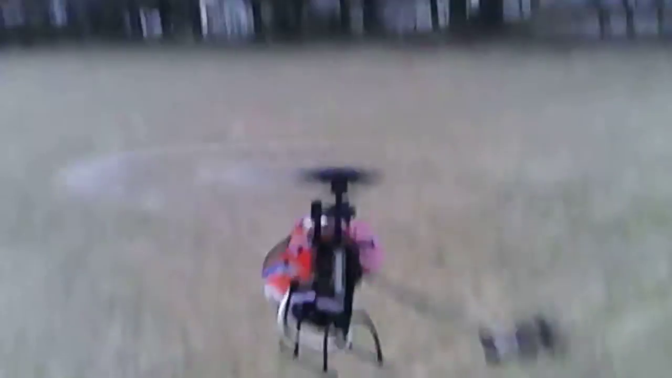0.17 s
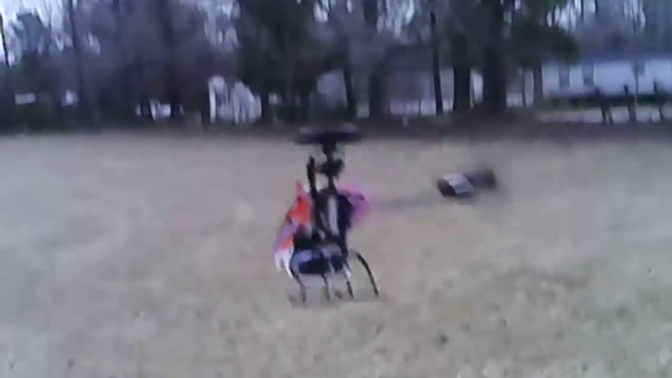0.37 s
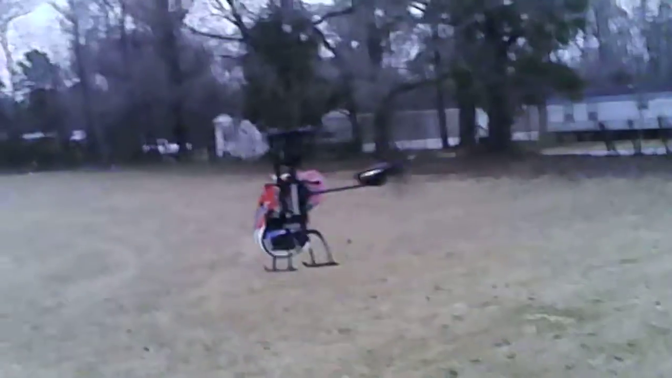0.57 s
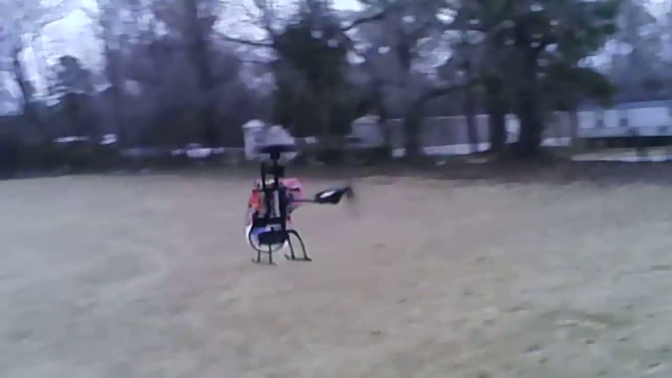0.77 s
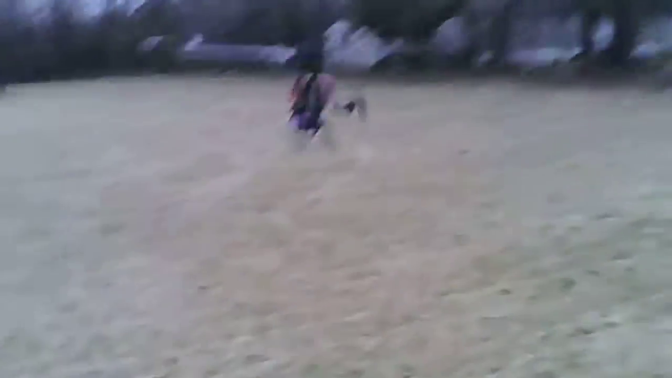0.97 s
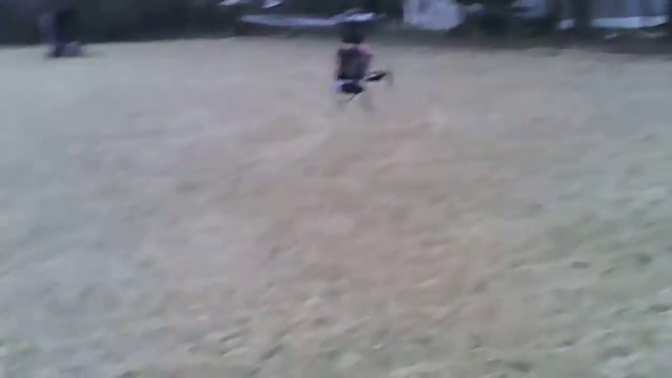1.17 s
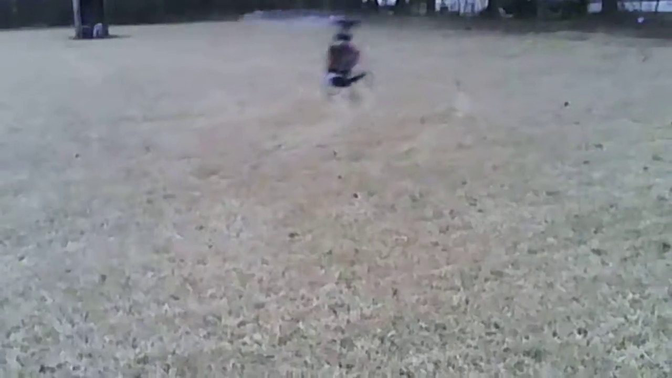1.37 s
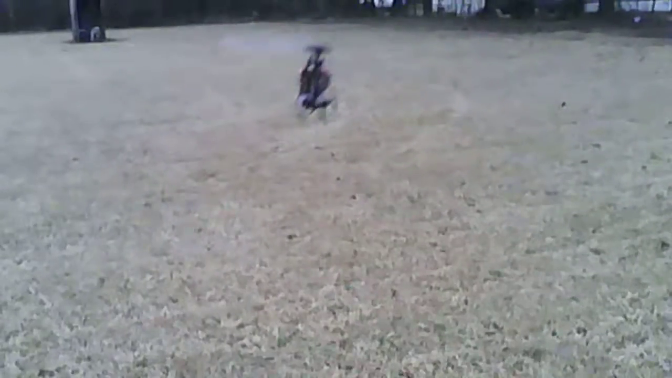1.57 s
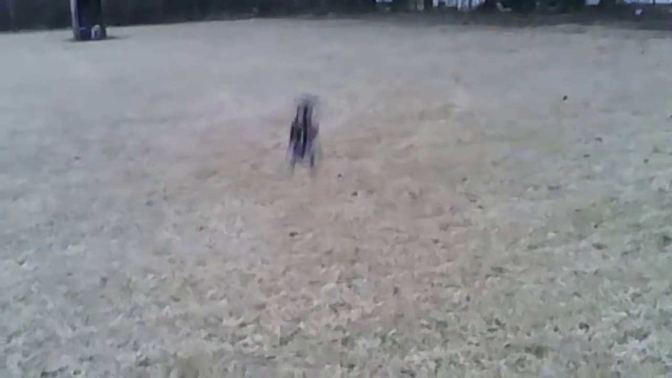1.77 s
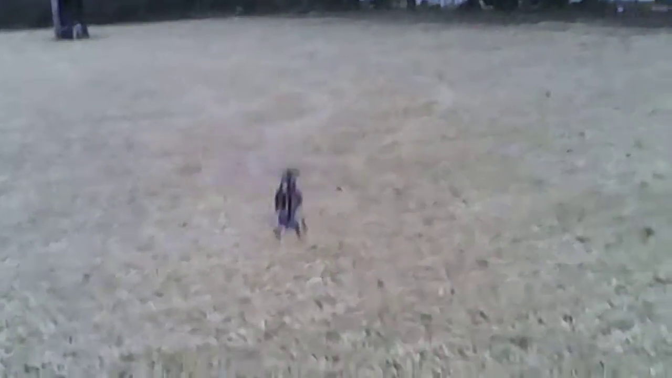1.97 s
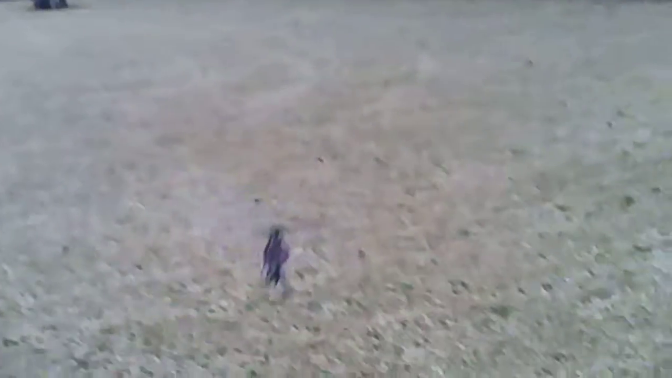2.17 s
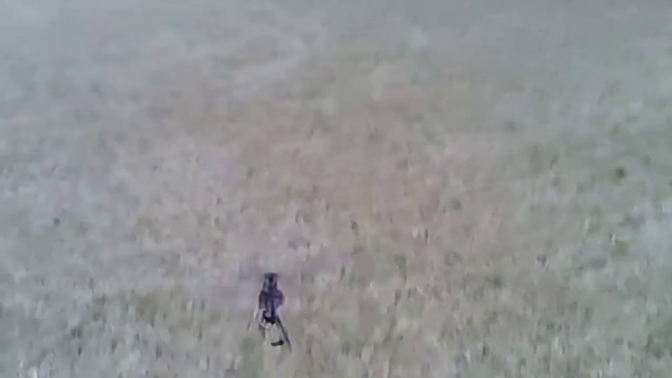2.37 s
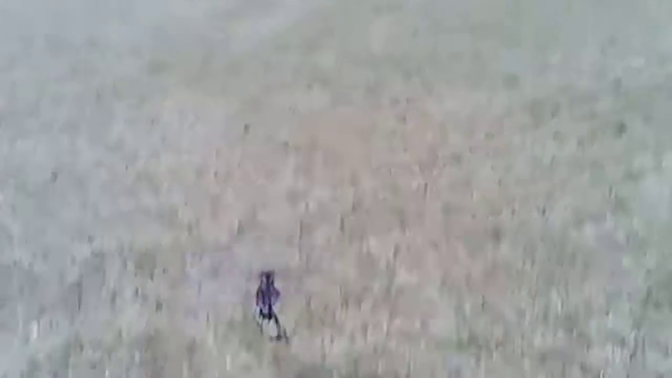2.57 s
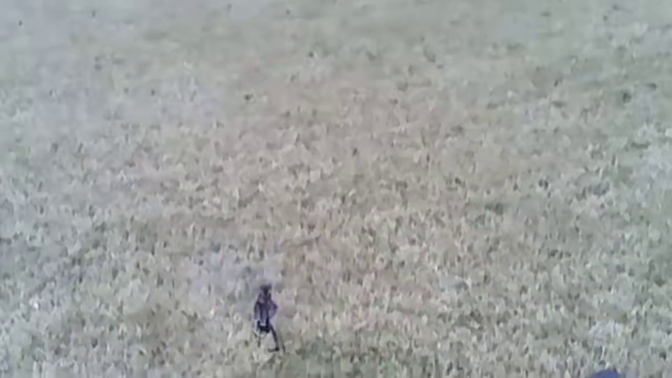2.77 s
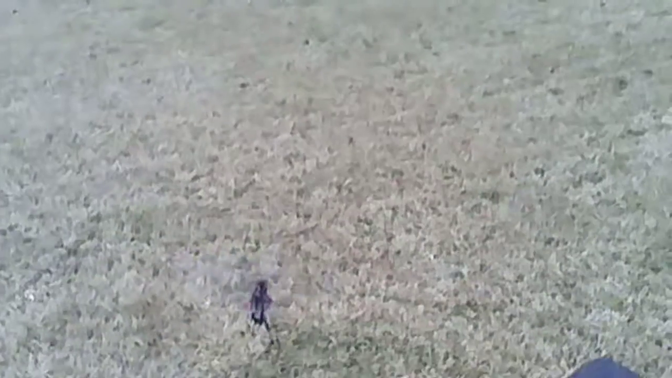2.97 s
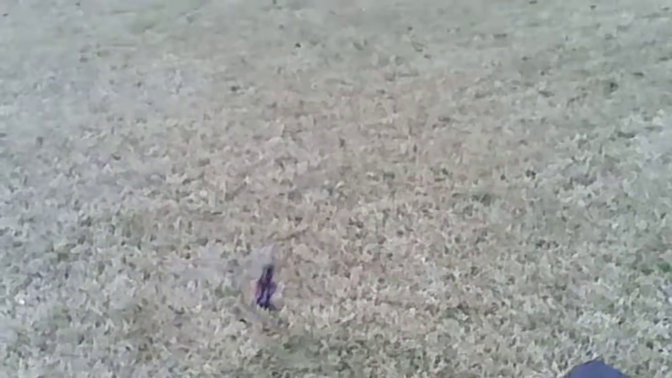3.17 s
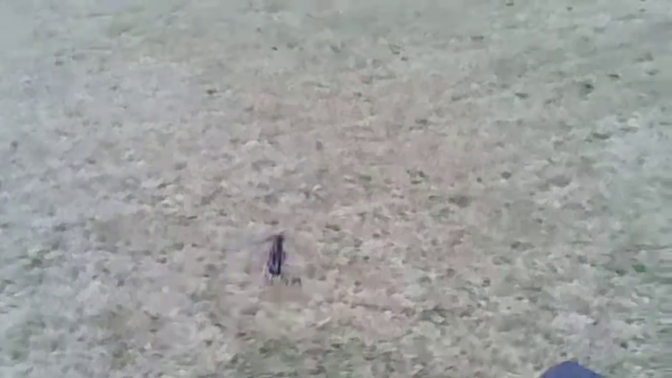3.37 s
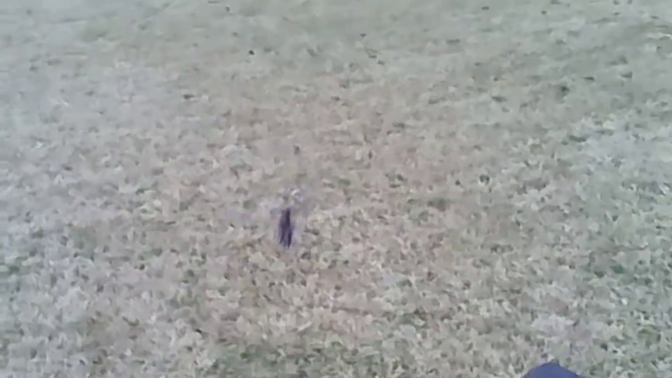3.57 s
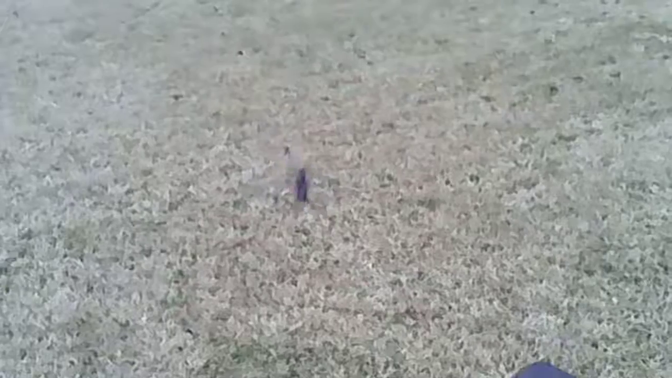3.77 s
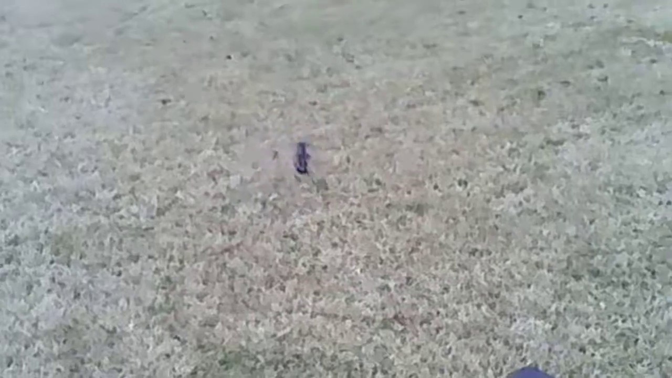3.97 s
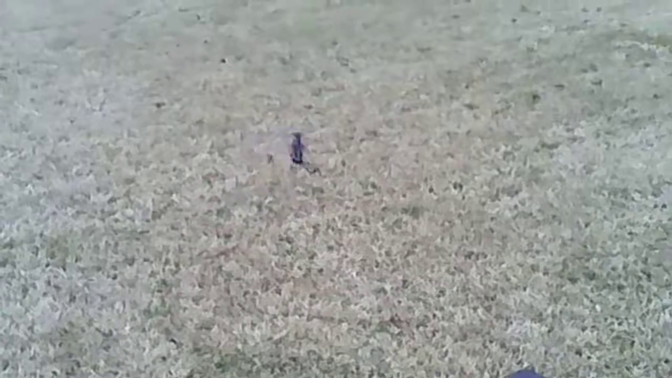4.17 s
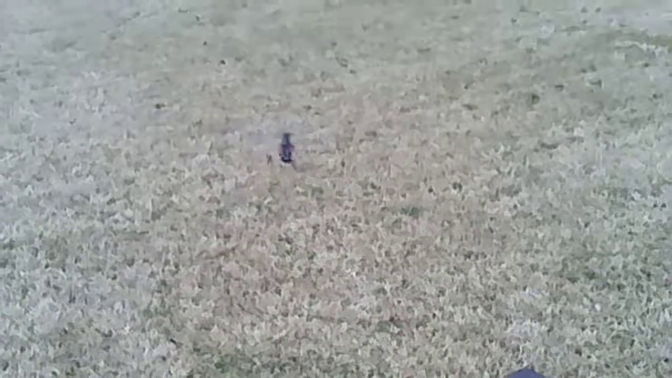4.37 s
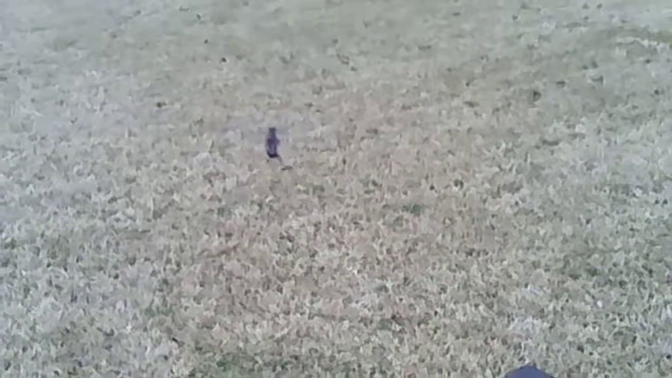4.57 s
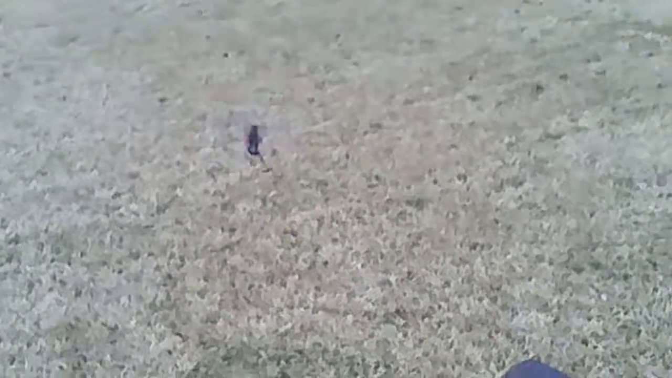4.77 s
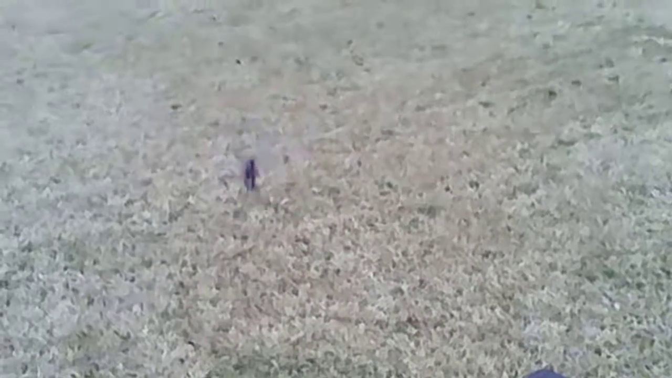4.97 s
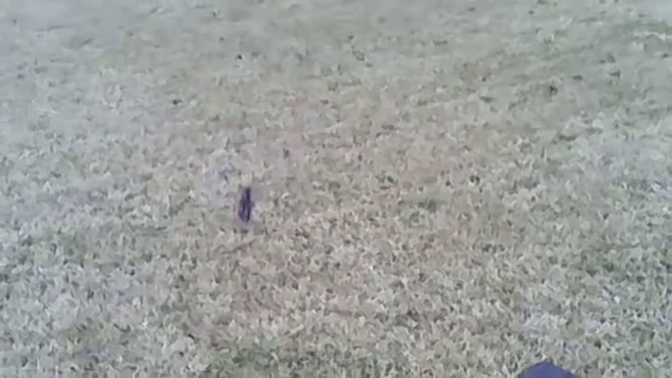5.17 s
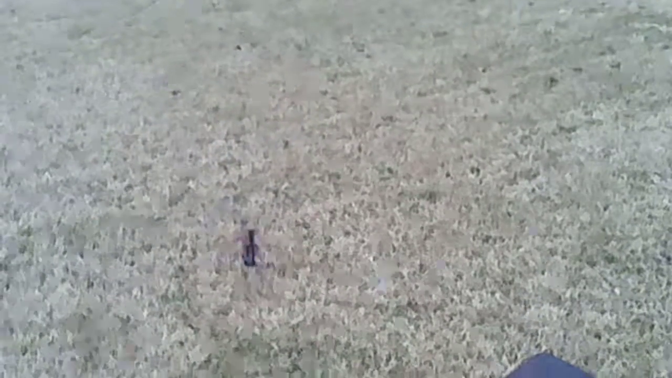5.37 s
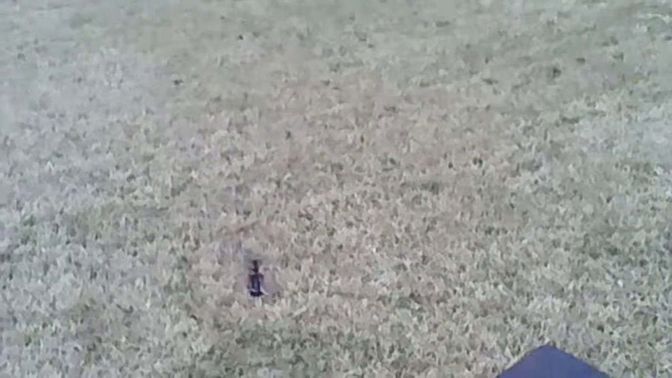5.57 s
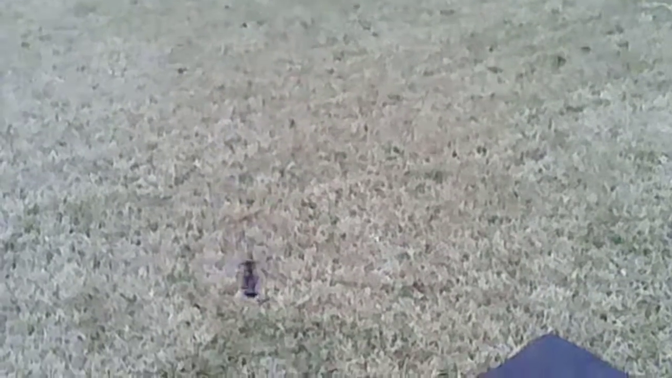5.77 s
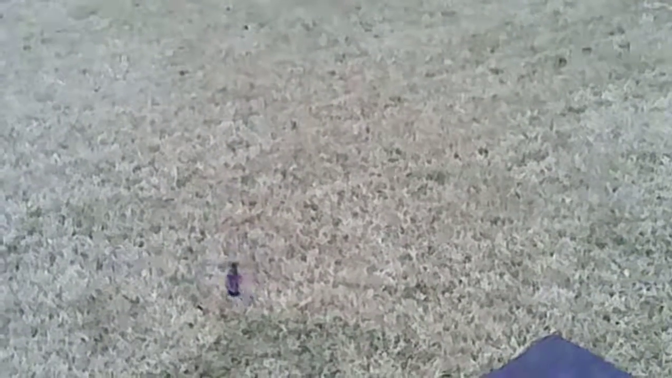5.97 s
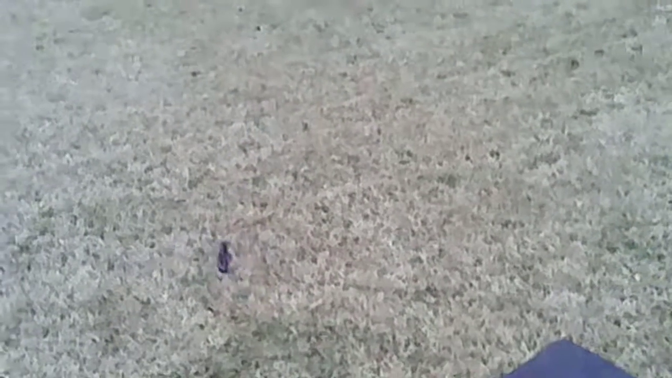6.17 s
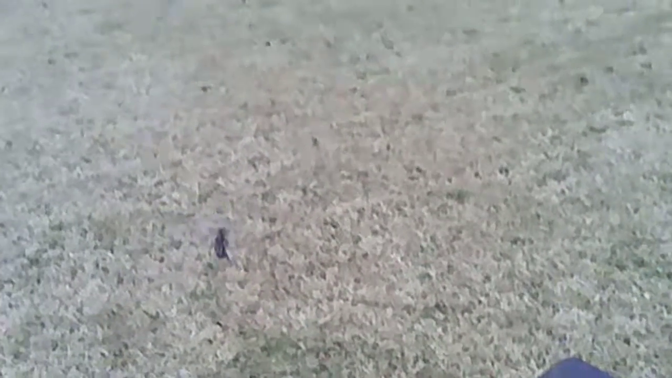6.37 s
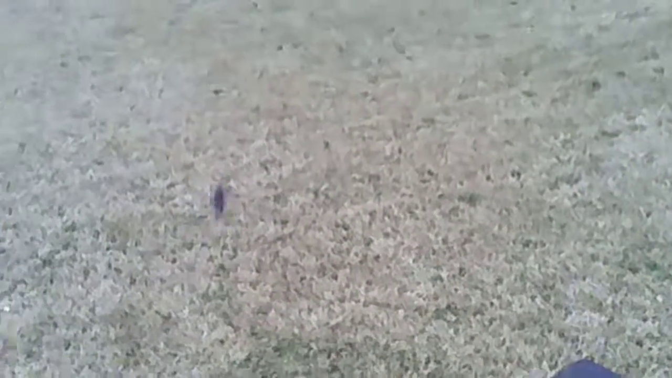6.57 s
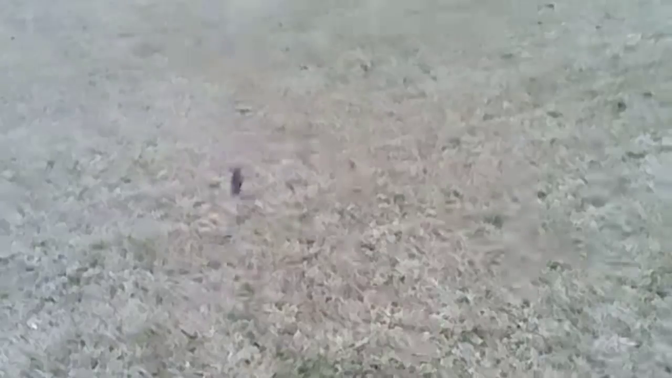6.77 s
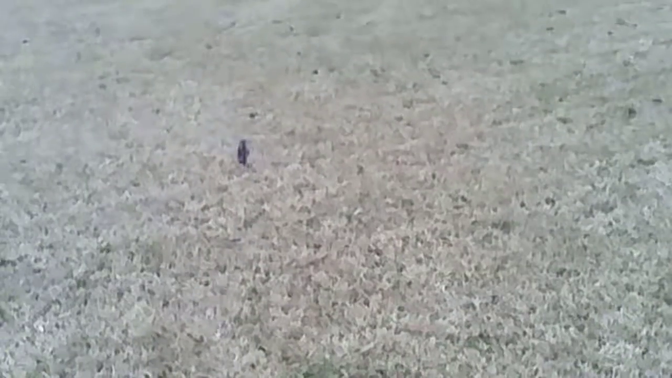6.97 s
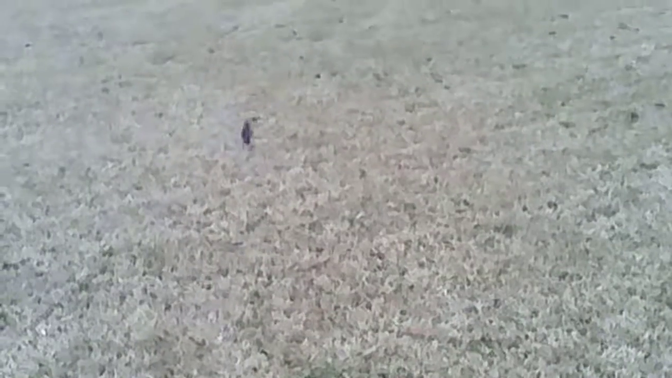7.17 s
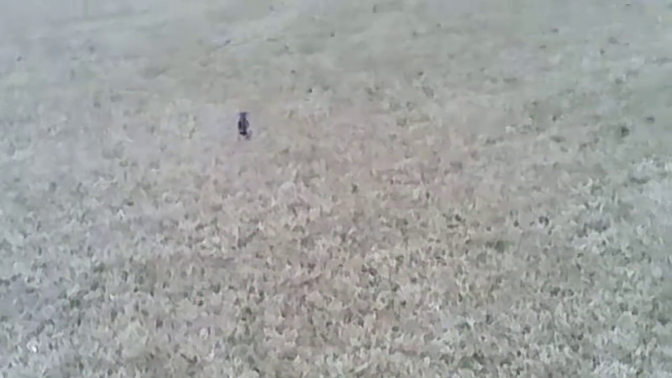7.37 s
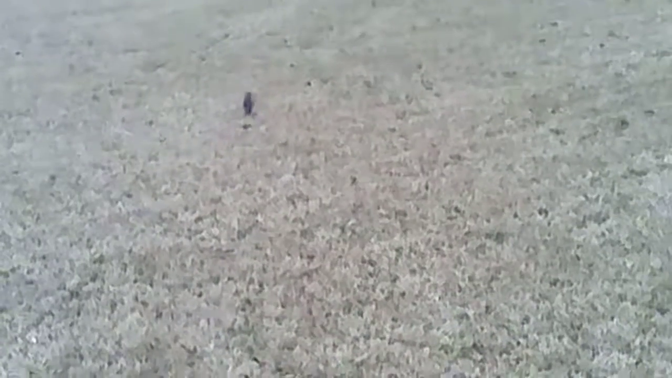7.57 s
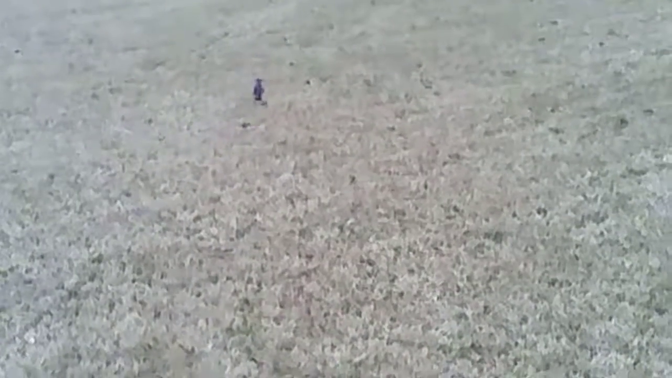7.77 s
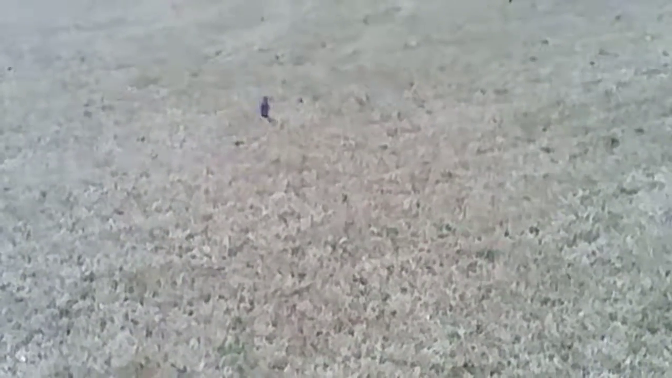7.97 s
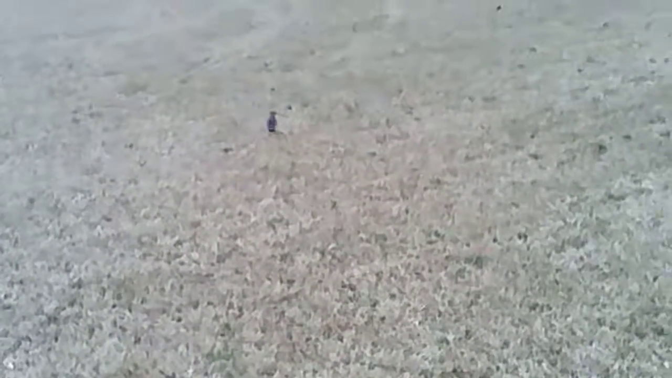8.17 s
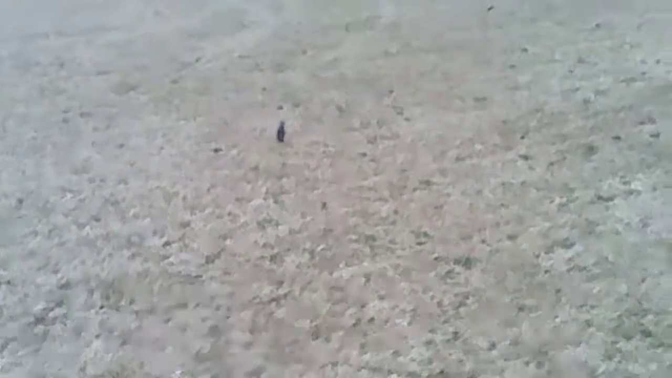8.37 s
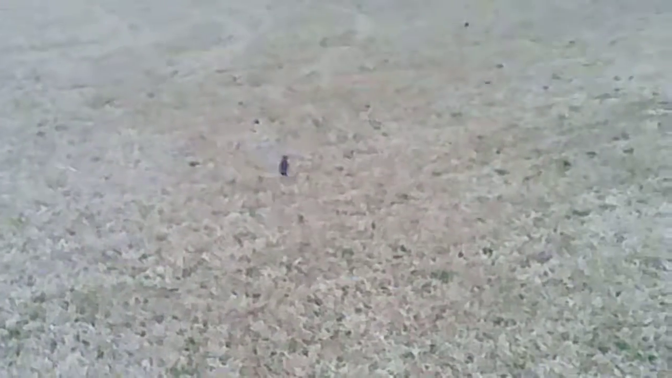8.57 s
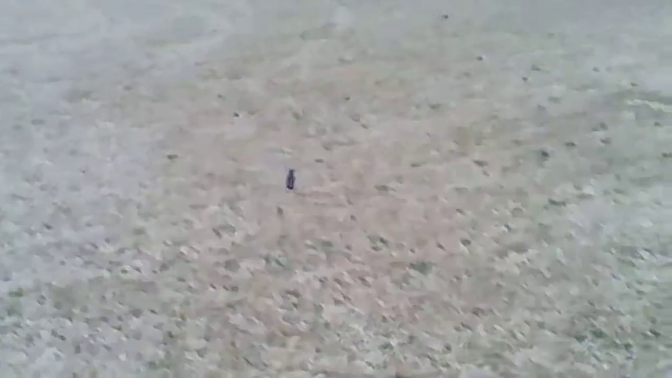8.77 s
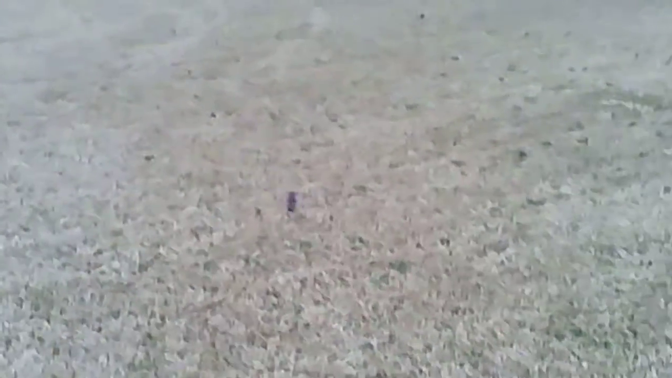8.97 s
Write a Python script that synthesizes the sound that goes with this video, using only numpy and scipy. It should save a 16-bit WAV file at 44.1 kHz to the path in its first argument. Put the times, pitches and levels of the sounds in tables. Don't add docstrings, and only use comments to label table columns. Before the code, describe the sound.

A small electric model helicopter hovers about a metre away outdoors, with a shrill, nearly steady gear whine around 3.7 kHz, many buzzing metallic overtones, a lower motor tone and bright sizzling hiss. A light hollow buckle knock comes at 0.2 s, while a faint fuzzy tail-rotor hum shifts in pitch during the first 1.5 s. The craft moves off and gradually quietens. From about 2 to 3.1 s a jacket rustles brightly near the worn microphone, with quick buckle clicks around 2.4 s. The whine dips slightly near 3.7 s; small taps and short scuffs follow around 4 s. A sharper buckle rattle clusters at 5.2-5.4 s. Another pitch sag comes near 6.5 s as the whine thins with distance. Soft cloth rubbing returns from about 8 s to the end at 9 s. Faint far traffic hums throughout, without obvious echo.

```python
import sys
import numpy as np
from scipy import signal
from scipy.fft import rfft, irfft, next_fast_len
from scipy.io import wavfile
from scipy.ndimage import uniform_filter1d, map_coordinates

SR = 44100
rng = np.random.default_rng(int(sys.argv[2]) if len(sys.argv) > 2 else 0)


def level_to_linear(level):
    exponent = np.asarray(level, float) / 20
    return 10 ** exponent


def unload_audio(sound):
    columns = np.transpose(np.atleast_2d(sound))
    steps = np.round(np.clip(columns, -1, 1) * 32767)
    wavfile.write(sys.argv[1], SR, steps.astype(np.int16))


N = 397341
GEAR_TEETH = 64

# f/Hz, level per Hz/dB
HISS_SPECTRUM = [(3000, -32), (3800, -8), (4600, -13), (5150, -40), (5550, -14.5), (6300, -29), (6850, -9),
                 (7700, -0.5), (8400, -7.5), (9100, 0.5), (9600, -1), (10500, 1), (11000, -1.5),
                 (11100, -22)]
# t/s, tooth mesh f/Hz
MESH_SPEED = [(0, 3628), (.25, 3650), (.45, 3651), (.87, 3679), (1.15, 3676), (2.0, 3732), (2.6, 3667),
              (2.95, 3648), (3.9, 3648), (4.33, 3691), (4.75, 3655), (5.1, 3669), (5.7, 3630), (6.25, 3647),
              (7.0, 3662), (7.25, 3659), (8.07, 3686), (9.01, 3677)]
# t/s, distance/m
FLIGHT_PATH = [(0, 1), (.1, 0.94), (.43, 1.17), (.8, 1.64), (1.43, 1.89), (2.66, 2.96), (3.5, 3.56),
               (4.5, 4.32), (5.6, 3.8), (6.4, 4.36), (7.5, 5.76), (7.85, 6.2), (9.01, 6.9)]
# t/s, level/dB
FLANK_TURN = [(0, -2.5), (1.4, -3.5), (2.66, -1.5), (2.95, 1.5), (3.6, 1), (3.75, -2.5), (4.7, -3.5),
              (5.2, 1), (6.42, 1.5), (6.52, -2), (7.5, -4), (7.85, -1.5), (9.01, 0.5)]


def evened(x):
    return x / np.sqrt(np.mean(x ** 2) + 1e-20)


def spectrum_at(points, hz):
    f, value = np.transpose(points)
    return np.interp(np.log(hz + 1), np.log(f + 1), value)


def follow(curve, t):
    s, value = np.transpose(curve)
    return np.interp(t, s, value)


def bump(t, centre, half):
    return np.exp(-((t - centre) / half) ** 2)


def noise(spectrum, patchy_db, size=1024, moving_db=None):
    frames = 4 * N // size + 5
    hz = np.fft.rfftfreq(size, 1 / SR)
    a, b, patches = rng.standard_normal((frames, len(hz), 3)).T
    patches = uniform_filter1d(patches, size=10, axis=0)
    patches = evened(uniform_filter1d(patches, size=14, axis=1))
    z = (a + 1j * b) * level_to_linear(spectrum_at(spectrum, hz)[:, None] + patchy_db * patches)
    x = signal.istft(z, nperseg=size, noverlap=3 * size // 4)[1][:N]
    if moving_db is None:
        return evened(x)
    frame_t = np.arange(frames) * size / 4 / SR
    z *= level_to_linear(moving_db(frame_t, hz).T) / x.std()
    return signal.istft(z, nperseg=size, noverlap=3 * size // 4)[1][:N]


def by_turn(table, rows, turns):
    return map_coordinates(table, [rows, turns % 1 * table.shape[1]], order=1, mode="grid-wrap")


def gear_db(t):
    return -24 - 20 * np.log10(follow(FLIGHT_PATH, t))


def heading_db(t, hz):
    # f/Hz, half width/Hz, share of the flank swing, extra level at 1 m/dB, extra level far away/dB
    ring_bands = [
        (7900, 590, 0.88, 7, 1.4),
        (5470, 760, 0.88, 7, 3.5),
    ]
    yaw_db = follow(FLANK_TURN, t)
    close = bump(follow(FLIGHT_PATH, t), 0.91, 0.96)
    level_db = gear_db(t)[:, None]
    for centre_hz, width, share, close_db, far_db in ring_bands:
        band = np.exp(-((hz - centre_hz) / width) ** 4)
        level_db = level_db + band * (share * yaw_db + close_db * close + far_db)[:, None]
    return level_db


def load_db(turns, blade_db=0.07, motor_db=0.5, blade_place=0.069, motor_place=0.1):
    blade = blade_db * np.cos(4 * np.pi * (turns - blade_place))
    motor = motor_db * np.cos(16 * np.pi * (turns - motor_place))
    return blade + motor


def sag_hz(t):
    # t/s, half length/s, mesh shift f/Hz
    pulls = [
        (3.68, .12, -23),
        (5.42, .1, -7),
        (6.52, .12, -20),
        (8.36, .09, -7),
        (8.78, .13, -11),
    ]
    return sum(hz * bump(t, s, half) for s, half, hz in pulls)


def mesh_rate():
    t = np.arange(N) / SR
    steady = uniform_filter1d(follow(MESH_SPEED, t), size=round(0.12 * SR), mode="nearest")
    return steady + sag_hz(t)


def far_yard():
    # f/Hz, level per Hz/dB
    yard_spectrum = [(15, -0.5), (60, -2), (90, -1.5), (102, 5.5), (116, -5.5), (140, -8), (260, -14),
                     (500, -11), (900, -0.5), (1400, -5.5), (2200, -10), (2750, -5), (3200, -17),
                     (11000, -25)]
    return level_to_linear(-41.5) * noise(yard_spectrum, patchy_db=0.26, size=4096)


def buckle(thump_hz=260, tick_hz=2900):
    # t/s, peak level/dB, ring f/Hz, T60/s, thump level/dB
    knocks = [(0.169, -31, 1247, 0.061, -1), (2.373, -31, 1212, 0.053, -24), (2.392, -31, 1230, .04, -17),
              (2.411, -32, 1200, .05, -18), (2.44, -35, 1250, .05, -18), (2.468, -29, 1216, .05, -7),
              (2.489, -31, 1270, .05, -18), (2.518, -27, 1330, .03, -19), (3.915, -29, 1452, .05, -3),
              (3.929, -32, 1460, .04, -3), (4.054, -37, 1410, 0.059, -14), (4.735, -37, 677, 0.13, -20),
              (5.04, -32, 4200, 0.031, -22), (5.248, -21.5, 1360, 0.032, -13),
              (5.275, -28, 1280, 0.043, -19), (5.323, -23, 1270, 0.085, -6), (5.344, -24, 1254, 0.056, -27),
              (5.363, -31, 1230, 0.082, -18), (5.386, -28.5, 1202, 0.048, -14),
              (5.26, -30, 1391, 0.033, -21), (5.298, -28, 1350, .05, -16)]
    out = np.zeros(N + SR)
    t = np.arange(SR // 5) / SR
    for s, db, hz, t60, thump_db in knocks:
        ring = level_to_linear(-60 * t / t60) * np.sin(2 * np.pi * hz * t * (1 - 0.53 * t))
        tick = level_to_linear(thump_db + 7 - 60 * t / .005) * np.sin(2 * np.pi * tick_hz * t)
        thump = level_to_linear(thump_db - 4 - 60 * t / .03) * np.sin(2 * np.pi * thump_hz * t)
        out[round(s * SR):][:len(t)] -= level_to_linear(db) * (ring + tick + thump)
    return out[:N]


def jacket(crackle_db=2.1):
    rubs = [
        (2.28, 0.5, 2.62, -37.5, -8.5),
        (2.8, 0.3, 3.11, -35.5, -27),
        (3.92, 0.049, 4.13, -47.5, 3.5),
        (4.25, 0.1, 4.26, -42, -3),
        (5.23, 0.054, 5.46, -48, -15),
        (7.9, 1, 8.05, -54.5, 9),
        (8.15, 0.093, 8.34, -42, -3.5),
        (8.45, 0.35, 9.6, -45.5, -0.5),
        (8.802, .25, 6.7, -42.5, -3),
    ]
    # f/Hz, level per Hz/dB
    cloth = [(600, -20), (1400, -12), (2000, -3.5), (2750, 5), (3400, -0.5), (4200, 0), (5000, -30),
             (6500, -16)]
    # f/Hz, level per Hz/dB
    scuff = [(300, -75), (700, 6.5), (1000, -2.5), (1500, 6), (1900, 3), (2500, -27)]
    rise_db, fall_db_per_s = 10, 220
    t, bright, dull = np.arange(N) / SR, np.zeros(N), np.zeros(N)
    for full, rise, end, db, dull_db in rubs:
        growth_db = rise_db * np.maximum(full - t, 0) / rise
        decay_db = fall_db_per_s * np.maximum(t - end, 0)
        stroke = level_to_linear(db - growth_db - decay_db)
        bright = np.hypot(bright, stroke)
        dull = np.hypot(dull, stroke * level_to_linear(dull_db))
    grain_db = crackle_db * evened(uniform_filter1d(rng.standard_normal(N), size=150))
    bright_rub = bright * noise(cloth, patchy_db=-0.5, size=256)
    dull_rub = dull * noise(scuff, patchy_db=1.0, size=512)
    return evened(level_to_linear(grain_db)) * (bright_rub + dull_rub)


def main_blades(turns, swish_db=-10.5, beat_db=1.5):
    # f/Hz, level per Hz/dB
    swish_spectrum = [(40, -5), (110, -2), (300, -17.5), (600, -8), (1350, 0.5), (1900, -1), (2750, 0),
                      (3250, -1), (3700, 3), (4600, -16)]
    # t/s, half length/s, level/dB
    tilts = [
        (0, 0.26, -57),
        (2.602, .48, -58.5),
    ]
    t = np.arange(N) / SR
    swish = noise(swish_spectrum, patchy_db=1.0) * level_to_linear(beat_db * np.cos(4 * np.pi * (turns - .2)))
    tilt = level_to_linear(-78) + sum(level_to_linear(db) * bump(t, s, half) for s, half, db in tilts)
    sixth = np.sqrt(2) * tilt * np.sin(12 * np.pi * turns)
    return level_to_linear(gear_db(t) + swish_db) * swish + sixth


def tail_rotor():
    # t/s, half length/s, shift f/Hz, lift level/dB
    kicks = [
        (0.348, 0.22, 28, 6.5),
        (0.723, .2, -14, 8.5),
        (1.198, 0.32, -16, 5.5),
        (2.594, .25, 16, 8),
        (4.493, .22, 7.5, 11),
        (4.951, .28, 36, 5.5),
    ]
    t = np.arange(N) / SR
    hz = 515.4 + sum(shift * bump(t, s, half) for s, half, shift, _ in kicks)
    db = gear_db(t) - 32 + sum(lift_db * bump(t, s, half) for s, half, _, lift_db in kicks)
    waver_hz = 5.36 * evened(uniform_filter1d(rng.standard_normal(N), size=1500))
    return level_to_linear(db) * np.sqrt(2) * np.sin(2 * np.pi * np.cumsum(hz + waver_hz) / SR)


def gear_hiss(turns, hiss_db=-5.0, rattle_db=0.0):
    rattle = evened(uniform_filter1d(rng.standard_normal(N), size=40))
    hiss = noise(HISS_SPECTRUM, patchy_db=1.0, moving_db=heading_db)
    return hiss * level_to_linear(hiss_db + load_db(turns) + rattle_db * rattle)


def whine(turns, comb_db=2.5, other_db=6.5, spread_db=2.5, fade_db=2.5):
    # rotor order, level/dB
    motor_orders = [(8, -29.9), (16, -30.8), (32, -26.7), (40, -33.2), (48, -25.5), (56, -33.5),
                    (72, -26.4), (80, -28.5), (88, -31.3), (96, -36.5), (104, -35.5), (112, -33.6),
                    (120, -24.2), (128, -20.0), (136, -17.7), (144, -24.3), (152, -19.2), (160, -23.8),
                    (168, -28.6), (176, -21.3), (184, -21.2), (192, -24.2), (200, -31.8)]
    # rotor order, level/dB
    tooth_orders = [(83, -35.4), (85, -36.0), (115, -36.9), (119, -32.6), (121, -30.8), (122, -25.9),
                    (127, -26.2), (129, -25.5), (130, -23.7), (131, -21.5), (133, -23.9), (135, -17.5),
                    (139, -24.3), (151, -28.0), (154, -25.7), (155, -28.0), (156, -26.9), (157, -23.2),
                    (158, -25.8), (161, -17.2), (163, -23.6), (166, -24.6), (170, -24.2), (172, -23.3),
                    (173, -21.2), (175, -18.3), (179, -18.9), (181, -20.8), (183, -20.7), (186, -19.6)]
    # rotor order, level/dB
    shaft_orders = [(2, -28), (8, -30), (9, -35.5), (10, -43), (16, -54), (32, -50), (40, -50), (48, -25),
                    (56, -29), (72, -27), (85, -40), (88, -33.5)]
    # side order, level re mesh tone/dB, place/turns
    mesh_sides = [(-2, -15.5, .16), (-1, -13, -.09), (1, -11.5, .22), (2, -11, -.25), (3, -16, .37),
                  (4, -23, -.1)]
    # side order, level re tone/dB, place/turns
    commutator_sides = [(-1, -14, -.08), (1, -19, .07), (2, -19, -.3)]
    # t/s, commutator level re hiss/dB
    motor_side = [(0, -7.5), (.8, -4.5), (1.4, -5.5), (2.0, -7.5), (2.25, -15.5), (2.62, -7), (3.1, -3.5),
                  (3.38, -6), (3.65, -14.5), (4.1, -12), (4.4, -8.5), (5.12, -12.5), (5.58, -3.5),
                  (5.88, -10.5), (6.15, -3.5), (6.55, -4), (7.35, -11.5), (9.01, -13)]
    # t/s, mesh level re hiss/dB
    wheel_side = [(0, -5), (.25, -1), (1.12, -4), (2.0, -4), (2.27, -1), (2.62, -5.5), (3.2, -5),
                  (3.5, -5.5), (3.8, -2), (5.3, -3), (5.72, -7), (6.55, -4), (7.1, -1.5), (7.95, -6),
                  (8.15, -1), (8.4, -5), (8.6, 0.5), (9.01, -0.5)]
    commutator, table_size, rows_per_s = 24, 8192, 16
    t = np.arange(0, N / SR + .2, 1 / rows_per_s)
    orders = np.arange(table_size // 2 + 1)
    hz = orders * follow(MESH_SPEED, t).mean() / GEAR_TEETH
    wheel_db = follow(wheel_side, t) + 0.13 * sag_hz(t)
    motor_db = follow(motor_side, t)
    level_db = spectrum_at(HISS_SPECTRUM, hz) - 33 + other_db + spread_db * rng.standard_normal(len(hz))
    level_db[(hz < 3000) | (hz > SR / 4)] = -120
    for order, db in motor_orders + tooth_orders + shaft_orders:
        level_db[int(order)] = db

    teeth = np.zeros(table_size)
    at = (np.arange(GEAR_TEETH) + rng.random(GEAR_TEETH)) / GEAR_TEETH
    force_db = 2.1 * rng.exponential(1, GEAR_TEETH) + 0.82 * load_db(at)
    teeth[(at * table_size).astype(int)] = level_to_linear(force_db) * rng.choice([-1, 1], GEAR_TEETH)
    phase = np.exp(1j * np.angle(rfft(teeth)))

    fading = evened(uniform_filter1d(rng.standard_normal((len(t), 256)), size=9, axis=0))
    fading = np.pad(fading, ((0, 0), (0, len(hz) - 256)))
    z = level_to_linear(level_db + heading_db(t, hz) + comb_db + fade_db * fading) * phase

    forward_db = 0.62 * (-2.5 - wheel_db) + 0.95 * follow(FLANK_TURN, t)
    hidden_db = -4.5 - motor_db
    tones = ((GEAR_TEETH, gear_db(t) + wheel_db, mesh_sides),
             (commutator, gear_db(t) + motor_db, commutator_sides))
    for centre, db, sides in tones:
        z[:, centre] = level_to_linear(db)
        for side, side_db, place in sides:
            side = int(side)
            level_wander = fading[:, centre + side]
            place_wander = fading[:, 200 + centre // 2 + side]
            if centre == GEAR_TEETH:
                upper_db = np.clip(side, 0, 2) / 2 * forward_db
            else:
                upper_db = (0.39 + 0.13 * side) * hidden_db
            angle = np.exp(2j * np.pi * (place + 0.061 * place_wander))
            z[:, centre + side] = level_to_linear(db + side_db + upper_db + 2.2 * level_wander) * angle
    shapes = irfft(z) * table_size / np.sqrt(2)
    return by_turn(shapes, np.arange(N) / SR * rows_per_s, turns)


def scene():
    turns = np.cumsum(mesh_rate()) / SR / GEAR_TEETH
    worn = buckle() + jacket()
    craft = main_blades(turns) + tail_rotor() + gear_hiss(turns) + whine(turns)
    return (far_yard() + worn + craft)[None]


def roll_off(x):
    return signal.sosfilt(signal.butter(12, 12500, fs=SR, output="sos"), x)


def record(dry):
    # f/Hz, level/dB
    smoothing = [(9500, 0.5), (10700, 2), (11025, 2), (11400, -5.5), (12000, -22.5), (12250, -23),
                 (12340, -36), (12360, -90)]
    doubled = 2 * dry * (np.arange(N) % 2 == 0)
    size = next_fast_len(N)
    gain = level_to_linear(spectrum_at(smoothing, np.fft.rfftfreq(size, 1 / SR)))
    smooth = irfft(rfft(doubled, size) * gain, size)[:, :N]
    return roll_off(smooth - .005)


dry = scene()
out = record(dry)
unload_audio(out)
```